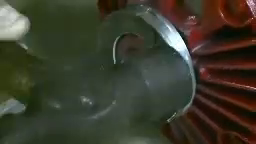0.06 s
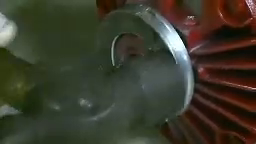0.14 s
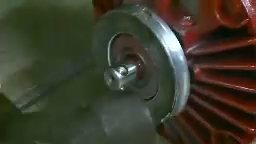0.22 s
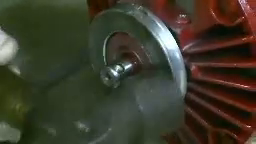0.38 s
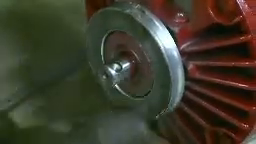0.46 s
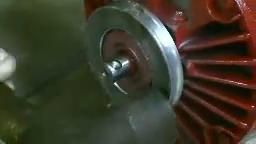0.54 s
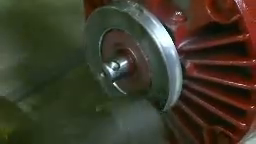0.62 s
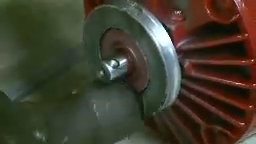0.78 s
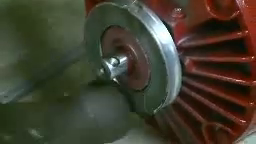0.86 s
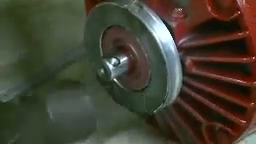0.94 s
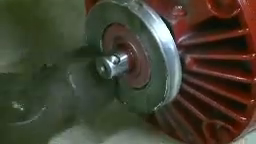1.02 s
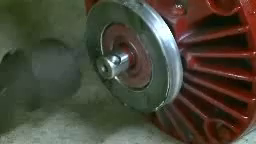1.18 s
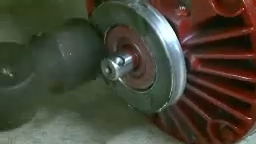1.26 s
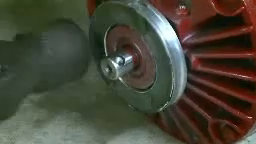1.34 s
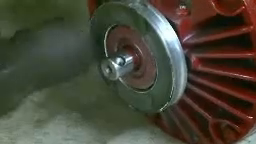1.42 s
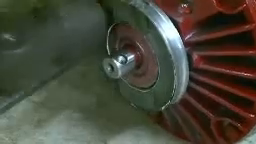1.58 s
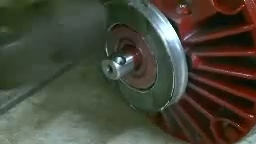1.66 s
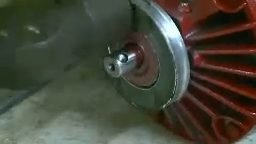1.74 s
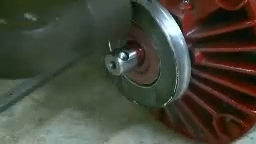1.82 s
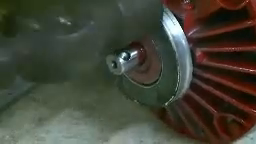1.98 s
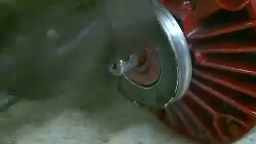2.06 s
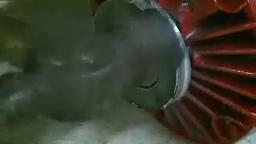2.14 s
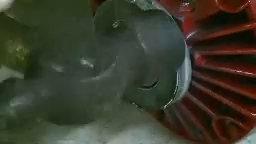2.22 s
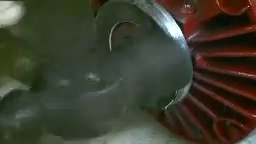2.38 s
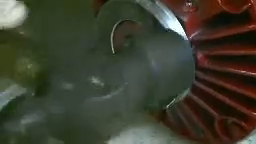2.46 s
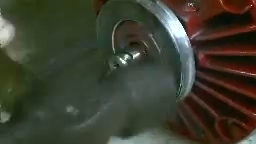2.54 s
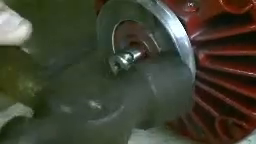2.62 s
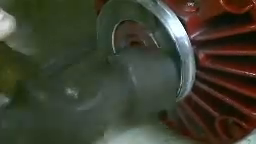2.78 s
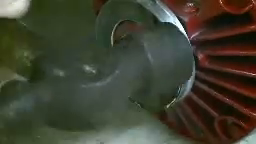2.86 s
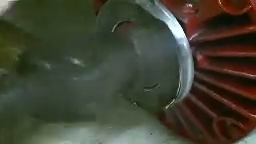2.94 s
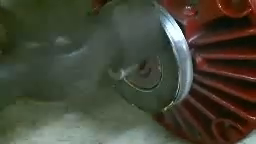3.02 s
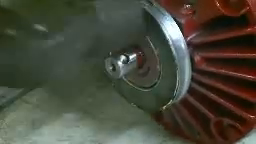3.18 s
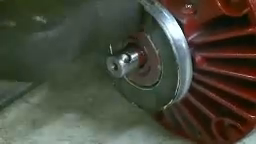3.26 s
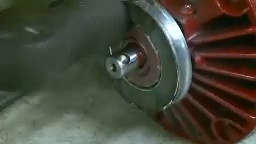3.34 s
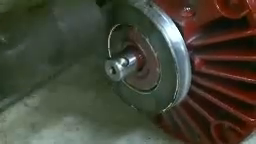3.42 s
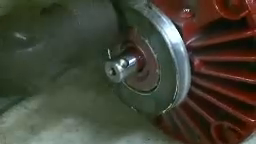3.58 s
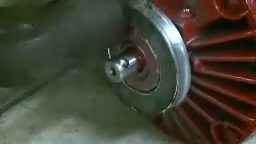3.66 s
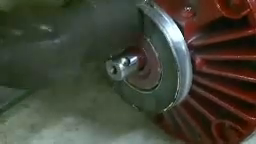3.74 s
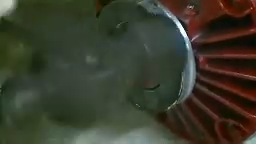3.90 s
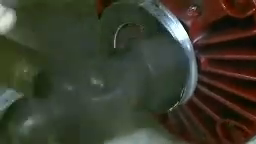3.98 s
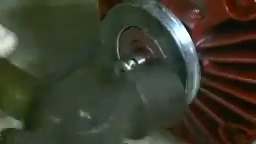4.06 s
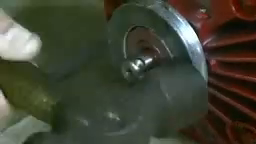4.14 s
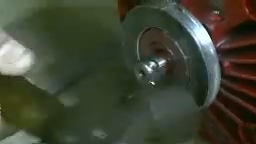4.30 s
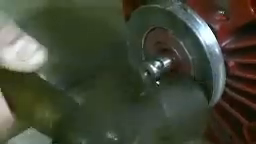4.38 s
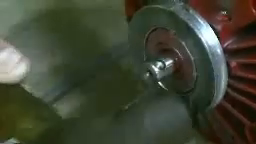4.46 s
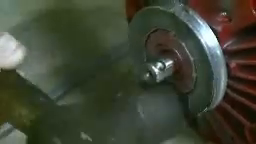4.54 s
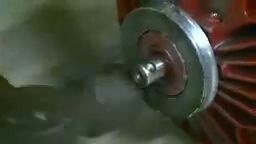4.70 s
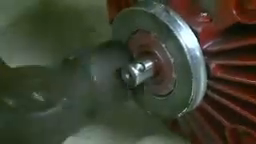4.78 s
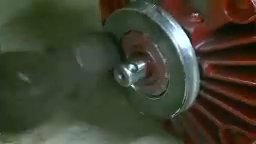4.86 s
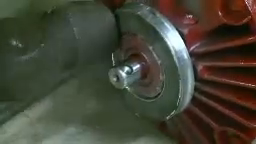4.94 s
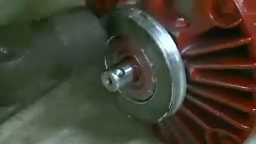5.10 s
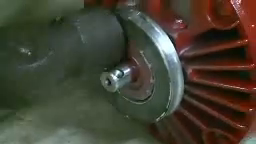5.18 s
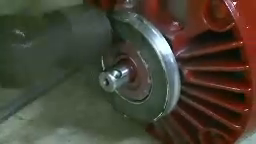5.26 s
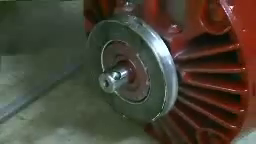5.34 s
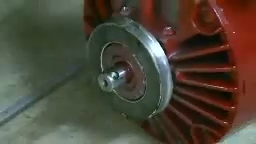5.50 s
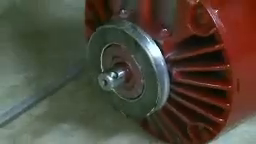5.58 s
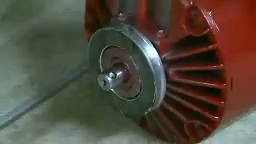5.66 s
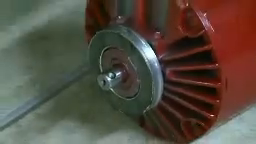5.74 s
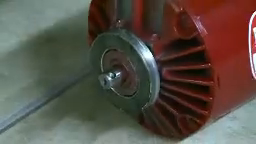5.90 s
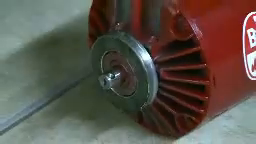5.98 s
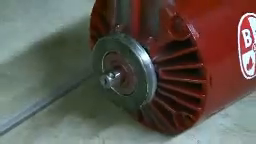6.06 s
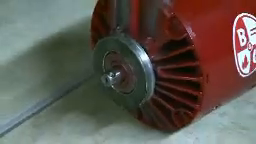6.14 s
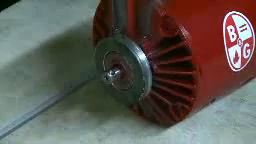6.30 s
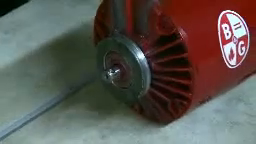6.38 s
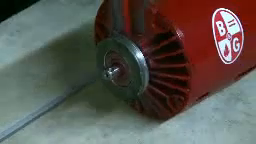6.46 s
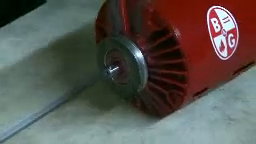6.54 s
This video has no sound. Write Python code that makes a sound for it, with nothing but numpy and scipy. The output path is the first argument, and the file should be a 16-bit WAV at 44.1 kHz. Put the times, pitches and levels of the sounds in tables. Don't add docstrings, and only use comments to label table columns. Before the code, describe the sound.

From 0 s a hammer taps a rubber-damped metal mount on a motor, roughly every 0.23 s. Each blow is a short, dry knock: a hard steel click with a gritty bright edge, a dull mount thump, a brief casing ring near 1.5 kHz and a low bench hum around 120 Hz, answered by a short workshop reverberation. Faint grip knocks precede some blows. From about 1 to 2.3 s the taps turn softer and duller; from 2.5 to 4.4 s they are loudest and hardest, with small rebounds. They become uneven, weak and strong alternating, and end at 5.2 s. The hum dies away into quiet low room noise. From 5.4 to 6.3 s a sleeve brushes softly, a hand makes tiny ticks and leans on the bench, and a small metal part clinks faintly. At 6.53 s something heavy thuds onto the bench, with low rattling, cut off as the sound ends. Left channel only.

```python
import sys
import numpy as np
from scipy import signal
from scipy.io import wavfile
from scipy.ndimage import uniform_filter1d

SR = 44100
rng = np.random.default_rng(int(sys.argv[2]) if len(sys.argv) > 2 else 0)


def invert_db(x):
    u = np.asarray(x, float) / 20
    return 10 ** u


def to_wav(s):
    ch = np.atleast_2d(s).T
    pcm = np.round(np.clip(ch, -1, 1) * 32767)
    wavfile.write(sys.argv[1], SR, pcm.astype(np.int16))


N = 291942
LEAD_S = 0.2


def evened(x):
    return x / np.sqrt(np.mean(x ** 2) + 1e-20)


def read(points, hz):
    f, value = np.transpose(points)
    return np.interp(np.log(hz + 1), np.log(f + 1), value)


def add(mix, s, sound):
    at = round(s * SR)
    part = mix[max(at, 0):][:max(len(sound) + min(at, 0), 0)]
    part += sound[max(-at, 0):][:len(part)]


def ring(modes, length, rise, scatter_db, detune, merged=False):
    hz, db, t60 = np.transpose(modes)[:, :, None]
    t = np.arange(round(length * SR)) / SR
    level_chance, pitch_chance = rng.standard_normal((2, len(modes), 1))
    level = invert_db(db + scatter_db * level_chance - 60 * t / t60)
    waves = level * np.sin(2 * np.pi * hz * (1 + detune * pitch_chance) * t)
    signs = (-1. if merged else 1.) ** np.arange(len(modes))
    return signs @ waves * (1 - np.exp(-t / rise))


def hiss(spectrum, patchy_db):
    frames, hz = N // 256 + 5, np.fft.rfftfreq(1024, 1 / SR)
    real, imaginary, patches = rng.standard_normal((frames, 513, 3)).T
    patches = uniform_filter1d(patches, 10, 0)
    patches = evened(uniform_filter1d(patches, 14, 1))
    level = invert_db(read(spectrum, hz)[:, None] + patchy_db * patches)
    z = (real + 1j * imaginary) * level
    return evened(signal.istft(z, nperseg=1024, noverlap=768)[1][:N])


# frequency in Hz, level in dB per Hz.
AIR = [(20, 2), (400, -16.5), (484, -7.5), (603, -17), (1250, -20), (4310, -37), (8500, -39.5),
       (13000, -63.5)]


def air():
    return invert_db(-71) * hiss(AIR, 0.91)


# time in seconds, edge-on contact in dB, push into the bench in dB.
ROUND = [(0, 4.5, -50.5), (.6, 7, -48), (0.841, 5, -41.5), (1.3, 7, -44.5), (2.0, 1.5, -49.5),
         (2.25, 4.5, -62.5), (2.7, 1, -42.5), (3.3, -2.5, -40), (4.0, -0.5, -45.5), (4.6, 6.5, -48),
         (4.82, 4.5, -53.5), (5.2, 2.5, -52.5)]


def placed(s):
    at, edge_db, hum_db = np.transpose(ROUND)
    return np.interp(s, at, edge_db), np.interp(s, at, hum_db)


# frequency in Hz, level in dB, seconds to fade by 60 dB.
MOUNT = [(484, -5, 0.017), (672.4, 5, 0.014), (809.5, 2.5, 0.008)]
THUD = [(205, -15.5, 0.042), (314, -4, 0.017)]
RIM = [(2161, 0.5, 0.007), (2659, 0, 0.011), (2889, 1, 0.0094), (3220, -4, 0.015), (3912, -5.5, 0.016)]
EDGE = [(4244, -12.5, 0.0084), (4972, -15.5, .01), (5305, -14, 0.0088), (5760, -16, 0.012),
        (6846, -17, .008), (7836, -23, 0.012), (8943, -23.5, 0.0084), (10000, -26, 0.0078),
        (11460, -29.5, 0.0068)]
SIDES = [(1255, -5.5, 0.01), (1400, -4.5, 0.014), (1910, -9, 0.021)]


def knock(peak_db, hard_db, edge_db):
    rim = ring(RIM, 0.05, 0.00034, 2.7, 0.015, merged=True)
    edge = ring(EDGE, 0.05, 0.00031, 2.5, 0.019, merged=True)
    sides = ring(SIDES, 0.05, 0.00083, 1.0, 0.029)
    t = np.arange(len(rim)) / SR
    grit_band = signal.butter(2, [5400, 11700], "band", fs=SR)
    grit = signal.lfilter(*grit_band, rng.standard_normal(len(rim)))
    grit = grit * invert_db(-23.5 - 60 * t / 0.035)
    steel = rim + invert_db(edge_db) * (edge + grit) + invert_db(0.63 * min(hard_db, 3)) * sides
    mount = ring(MOUNT, 0.05, 0.00016, 1.0, 0.057, merged=True)
    thud = ring(THUD, 0.05, 0.0018, 3.6, 0.082)
    rubber = mount + invert_db(-0.6 * max(hard_db, -8)) * thud
    both = rubber + invert_db(hard_db) * steel
    return invert_db(peak_db) * both / abs(both).max()


def knocks(hits):
    return [(s + 0.0008, knock(*how)) for s, *how in hits]


# start in seconds, peak in dB, hardness in dB, casing ring in dB.
BLOWS = [(-.03, -28.5, -9, -63), (0.115, -15.5, 0, -45.5), (0.364, -17, -1.5, -46.5), (0.601, -17, 0, -53),
         (0.835, -12.5, 0.5, -36.5), (1.065, -19, -4.5, -46.5), (1.288, -18.5, -4.5, -53.5),
         (1.524, -14, -3.5, -45.5), (1.757, -16, -5, -53), (1.988, -15, -5.5, -54),
         (2.221, -16.5, -4.5, -55), (2.456, -11.5, 0.5, -43.5), (2.683, -9.5, 2.5, -35.5),
         (2.896, -7.5, 5.5, -35.5), (3.11, -8.5, 3, -37.5), (3.323, -14.5, -1.5, -41),
         (3.534, -9.5, 5.5, -35.5), (3.736, -14, 0, -41), (3.96, -15.5, 0, -49.5), (4.183, -8, 4, -35),
         (4.405, -8.5, 3, -33), (4.61, -20.5, -4.5, -55.5), (4.821, -12.5, 0, -38),
         (5.017, -24, -1.5, -56.5), (5.202, -12, 1.5, -38.5)]


def blows():
    hits = []
    for s, db, hard_db, _ in BLOWS:
        edge_db = placed(s)[0] - 0.34 * (db + 12)
        hits.append((s, db, hard_db, edge_db))
    return knocks(hits)


# frequency in Hz, level in dB,
# seconds to fade by 60 dB.
CASING = [(1404, -4, 0.16), (1470.5, 1, 0.3), (1500, -6, 0.23), (3142, -25.5, 0.4), (3230, -23, 0.37),
          (3360, -25.5, 0.34), (4660, -21, 0.1), (6760, -28.5, 0.21),
          (6065, -28, .42), (6100, -30, .38)]


def casing():
    out = np.zeros(N)
    for s, *_, ring_db in BLOWS:
        add(out, s, invert_db(ring_db) * ring(CASING, 0.56, 0.007, 0.94, 0.003))
    return out


# frequency in Hz, level in dB, seconds to fade by 60 dB.
BENCH = [(121, 0.5, 0.87)]
# frequency in Hz, level in dB, seconds to fade by 60 dB.
LEGS = [(58.4, 0.5, 0.25), (38, -4, 0.23)]


def bench():
    out = np.zeros(N)
    starts = [row[0] for row in BLOWS]
    stops = starts[1:] + [starts[-1] + 0.67]
    for stop, (s, peak_db, hard_db, _) in zip(stops, BLOWS):
        hum = ring(BENCH, stop - s + 0.0078, 0.018, 0, 0.0073)
        seconds_left = np.arange(len(hum))[::-1] / SR
        fade = np.clip(seconds_left / 0.019, 0, 1)
        add(out, s, invert_db(placed(s)[1]) * hum * fade)
        legs_db = 0.5 * peak_db - 0.73 * hard_db - 41
        add(out, s, invert_db(legs_db) * ring(LEGS, 0.4, 0.0078, 2.5, 0.15))
    return out


# delay in seconds, level in dB over the scatter.
ECHOES = [(.0035, 2), (0.016, 5), (0.023, 5.5), (0.045, 16), (0.047, 8)]
# frequency in Hz, level in dB.
TOP_COLOUR = [(200, 4.5), (1000, 0.5), (2500, -8), (4000, -4.5), (5000, -9.5), (9000, -8), (15000, -24)]
# frequency in Hz, level in dB.
WALL_COLOUR = [(100, 14), (400, 1), (1000, 5.5), (2400, -3), (3300, 6.5), (3900, -2), (9000, 0),
               (15000, -25.5)]
# frequency in Hz, seconds to fade by 60 dB.
WALLS = [(100, 0.52), (300, 0.43), (700, 0.47), (1500, 0.59), (3200, 0.38), (5000, 0.39), (9000, .35)]


def workshop(tracks):
    taps = np.zeros((len(tracks), SR))
    at = np.arange(100, SR - 20, 20) + rng.integers(0, 20, (len(tracks), (SR - 101) // 20))
    np.put_along_axis(taps, at, rng.choice([-1., 1.], at.shape), 1)
    for late, db in ECHOES:
        taps[:, round(late * SR)] += invert_db(db)
    hz, t, z = signal.stft(taps, SR, nperseg=256)
    near = invert_db(-14 + read(TOP_COLOUR, hz)[:, None] - 60 * t / 0.062)
    far = invert_db(-28 + read(WALL_COLOUR, hz)[:, None] - 60 * t / read(WALLS, hz)[:, None])
    far = far * (1 - np.exp(-t / 0.035))
    reply = signal.istft(z * (near + far), SR, nperseg=256)[1]
    wet = signal.fftconvolve(tracks, reply, axes=1)[:, :tracks.shape[1]].sum(0)
    return wet[round(LEAD_S * SR):]


# start in seconds, peak in dB.
GRIP = [(0.082, -51), (0.325, -54), (0.567, -50.5), (0.789, -50), (1.25, -49.5), (1.478, -49.5),
        (1.715, -54), (3.913, -53), (4.135, -46.5)]


def grips():
    return knocks([(s, db, -16.5, -7.5) for s, db in GRIP])


# start in seconds, peak in dB, hardness in dB.
REBOUNDS = [(.8205, -17, -13), (1.077, -30, -3), (1.757, -29, 17), (1.986, -36.5, 8), (2.235, -36, 6),
            (2.471, -29, -1.5), (2.707, -17, 3.5), (2.717, -33.5, -10.5), (2.912, -32, 0.5),
            (3.126, -35, 11.5), (3.555, -33, -9.5), (3.983, -35, -6.5), (4.03, -34.5, -6),
            (4.21, -26.5, -1.5), (4.432, -20.5, -1.5), (4.76, -30.5, -13.5), (4.79, -50.5, -18),
            (4.835, -29, -10), (5.011, -42.5, 7), (5.224, -30, -3)]


def rebounds():
    return knocks([(s, db, hard_db, 1.5) for s, db, hard_db in REBOUNDS])


# start in seconds, peak in dB,
# pitch in Hz.
CLINKS = [
    (4.762, -46.5, 654),
    (5.8166, -66, 1350),
    (5.8691, -70, 1300),
    (6.0595, -73.5, 1400),
    (6.2197, -60.5, 1370),
    (6.238, -65, 1385),
]


def clinks():
    sounds = []
    for s, db, hz in CLINKS:
        modes = [(hz, db, 0.07), (hz / 1.025, db - 3, 0.15), (hz * 1.025, db - 10, 0.25)]
        sounds.append((s, ring(modes, 0.2, 0.0007, 0, 0)))
    return sounds


# start in seconds, length in seconds, level in dB.
RUSTLE = [
    (5.436, .09, -81),
    (5.577, 0.15, -77),
    (5.749, 0.046, -84),
    (5.802, 0.16, -88),
    (5.973, 0.12, -81),
    (6.078, .18, -81),
]
# frequency in Hz, level in dB per Hz.
CLOTH = [(300, 3), (1000, 2), (2500, -4), (5500, -1), (9000, -6), (12000, -17)]


def rustle():
    t = np.arange(N) / SR
    strokes = np.zeros(N)
    for s, length, db in RUSTLE:
        to_edge = np.minimum(t - s, s + length - t)
        strokes += invert_db(db - 2) * np.clip(to_edge / 0.022, 0, 1)
    return strokes * hiss(CLOTH, 3.8)


# start in seconds, peak in dB.
TICKS = [(5.483, -58), (5.523, -68), (5.592, -61), (5.61, -62), (5.761, -53), (6.034, -67), (6.114, -65.5),
         (6.165, -65.5), (6.19, -64)]


def ticks():
    return knocks([(s, db, 0.5, -2) for s, db in TICKS])


# start in seconds, hum in dB.
NUDGES = [
    (5.621, -65),
    (6.19, -62),
]


def nudges():
    out = np.zeros(N)
    for s, db in NUDGES:
        add(out, s, invert_db(db) * ring([(120.4, 1.5, 0.46), (49, 8.2, 0.22)], 0.4, 0.016, 0, 0))
    return out


DROP_S = 6.5275
# frequency in Hz, level in dB, seconds to fade by 60 dB.
DROP = [(121.3, -4, 3.6), (61.5, -17, 0.27), (207, -27, 0.13), (267, -10, 0.078), (364, -4.5, 0.058),
        (435, -12, .06), (565, -7, 0.15), (720, -19, 0.052), (1180, -3.5, 0.0074), (1480, 3.5, 0.0052),
        (2400, -11, 0.013), (3760, -0.5, 0.0015), (6940, -18, 0.006)]


def landing():
    return [(DROP_S, invert_db(-24) * ring(DROP, 0.2, 0.00024, 0, 0))]


# frequency in Hz, level in dB per Hz.
CLATTER = [(60, -3.5), (200, -2.5), (600, -13.5), (1500, -29), (3000, -36), (6000, -46.5), (12000, -59),
           (16000, -85)]


def clatter():
    t = np.maximum(np.arange(N) / SR - DROP_S, 0)
    swell = 1 - np.exp(-t / 0.001)
    return invert_db(-27.5 - 60 * t / 0.33) * swell * hiss(CLATTER, 6.7)


def contacts():
    direct, tracks = np.zeros(N), np.zeros((3, N + round(LEAD_S * SR)))
    sounds = blows() + rebounds() + grips() + ticks() + clinks() + landing()
    for k, (s, sound) in enumerate(sounds):
        add(direct, s, sound)
        click = sound * np.exp(-np.arange(len(sound)) / SR / 0.0026)
        add(tracks[k % len(tracks)], s + LEAD_S, click)
    return direct, tracks


def scene():
    direct, tracks = contacts()
    heard = direct + workshop(tracks) + casing() + bench() + nudges()
    heard = heard + clatter() + rustle() + air()
    return np.array([invert_db(6) * heard, np.zeros(N)])


def band_limit(x):
    return signal.sosfilt(signal.butter(12, 15660, fs=SR, output="sos"), x)


def record(dry):
    clean = signal.lfilter(*signal.butter(2, 16, "high", fs=SR), dry)
    return band_limit(clean)


dry = scene()
out = record(dry)
to_wav(out)
```